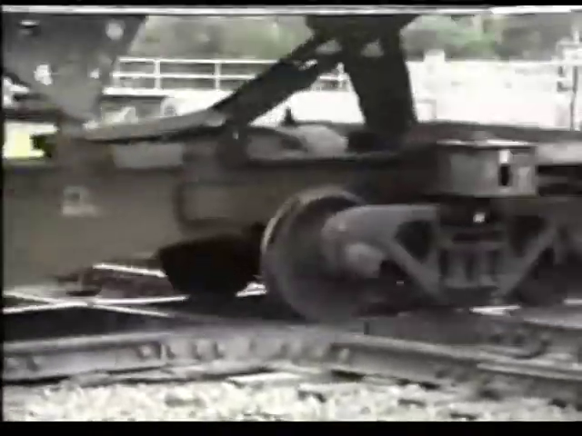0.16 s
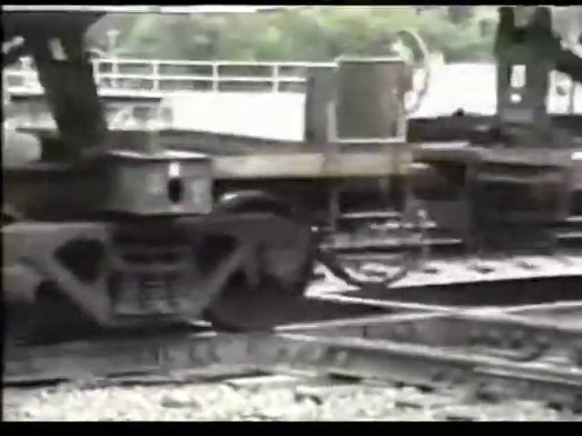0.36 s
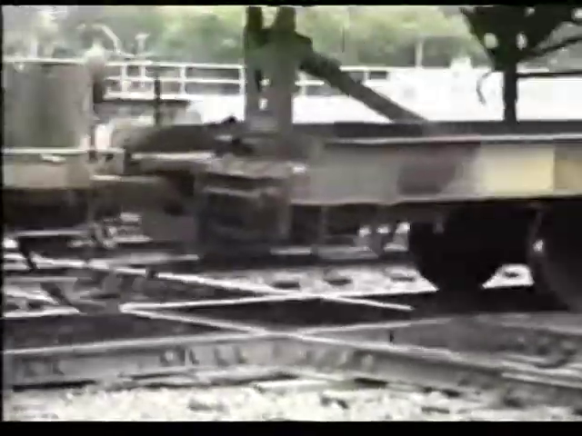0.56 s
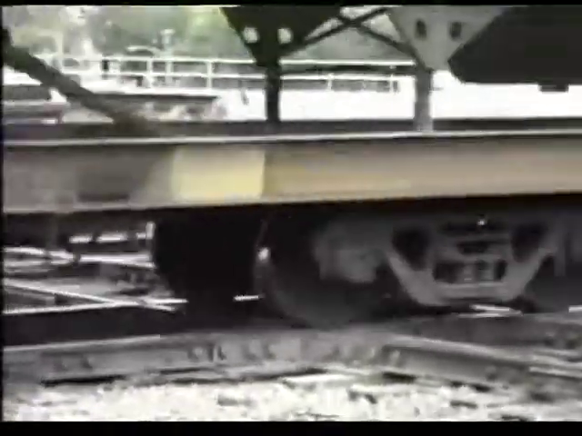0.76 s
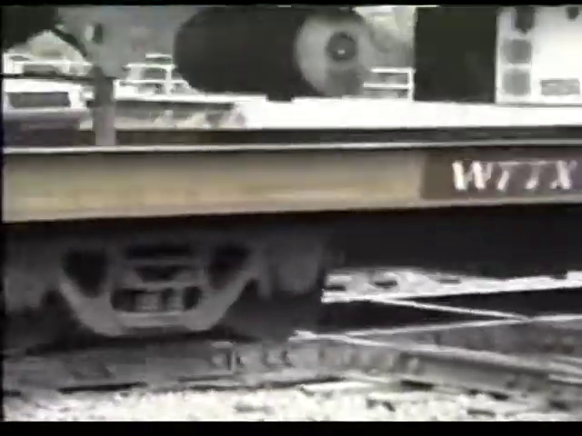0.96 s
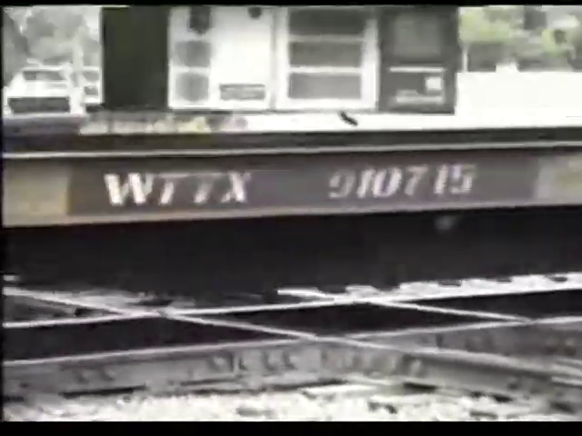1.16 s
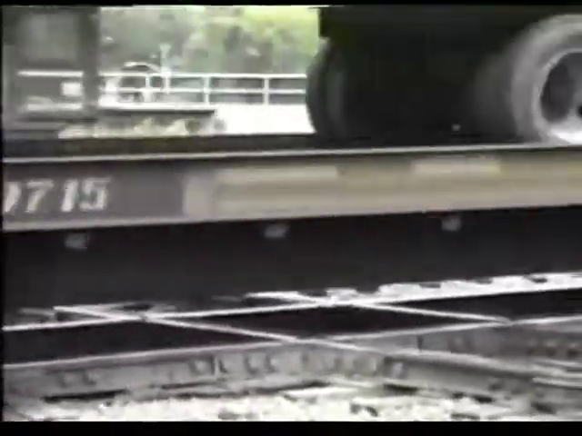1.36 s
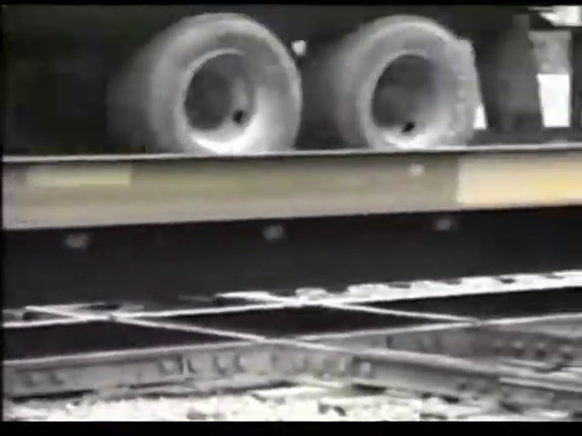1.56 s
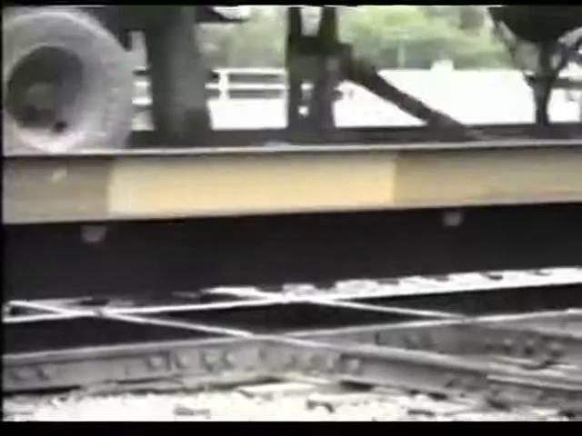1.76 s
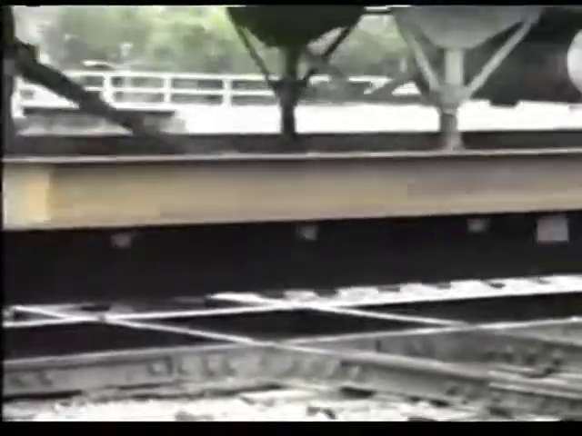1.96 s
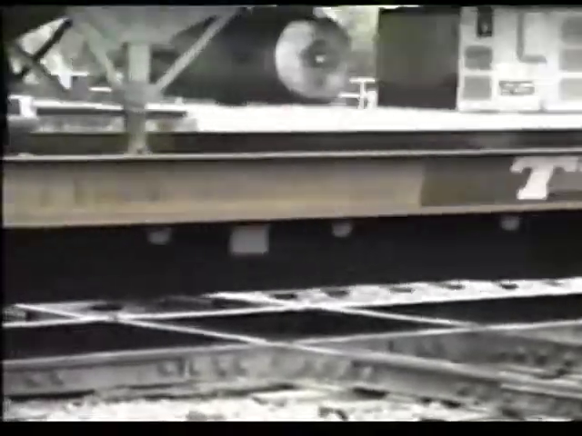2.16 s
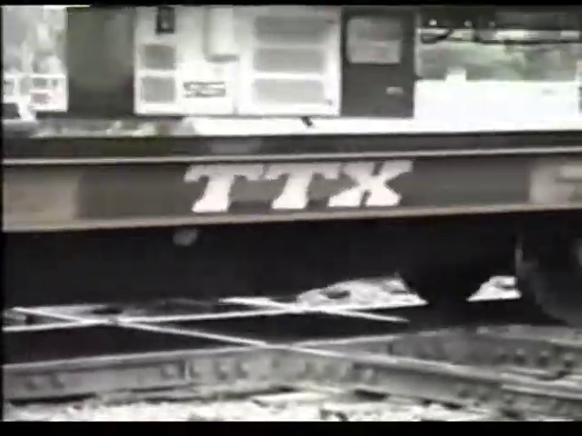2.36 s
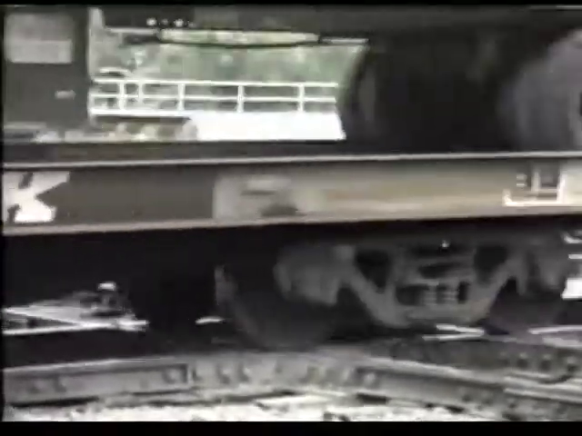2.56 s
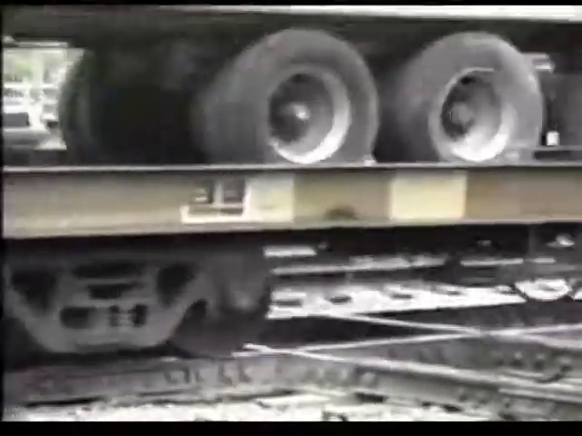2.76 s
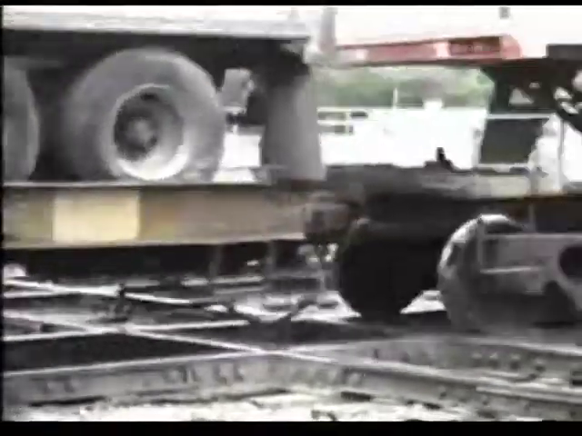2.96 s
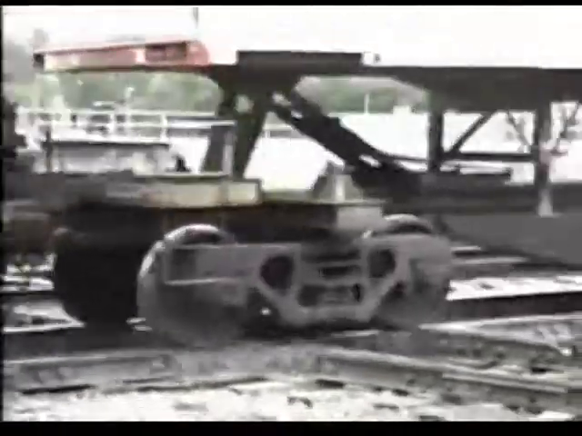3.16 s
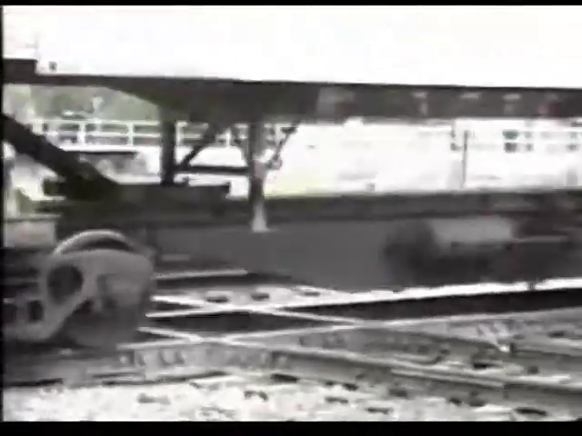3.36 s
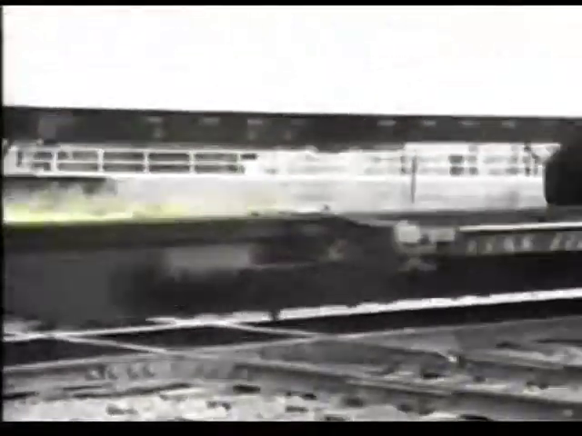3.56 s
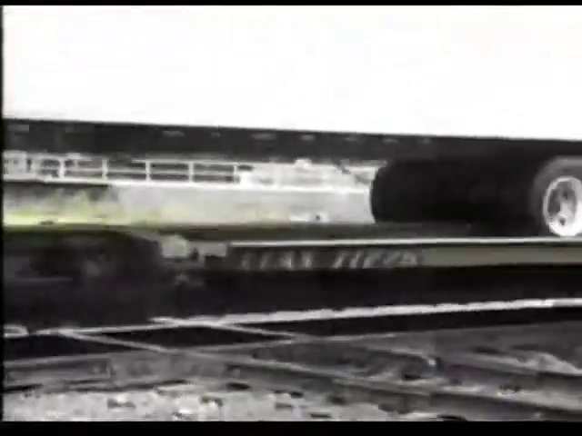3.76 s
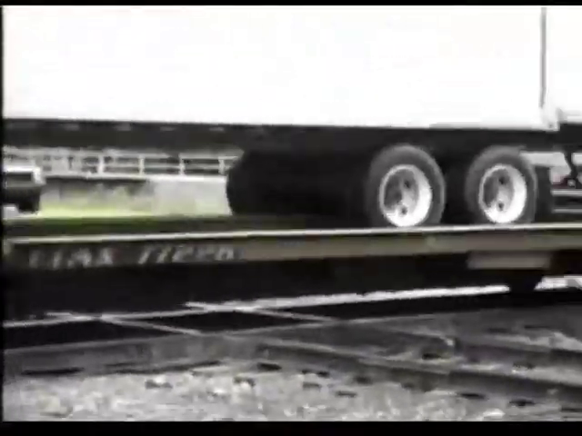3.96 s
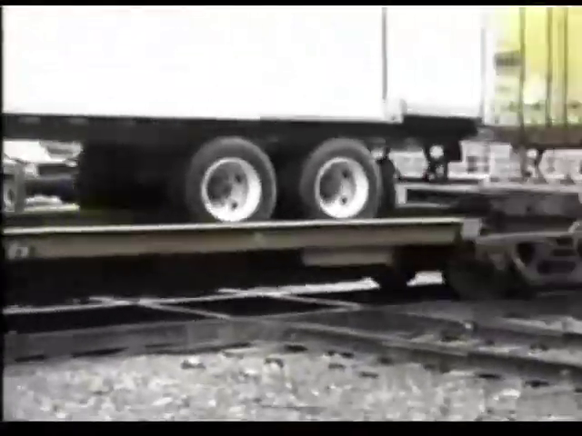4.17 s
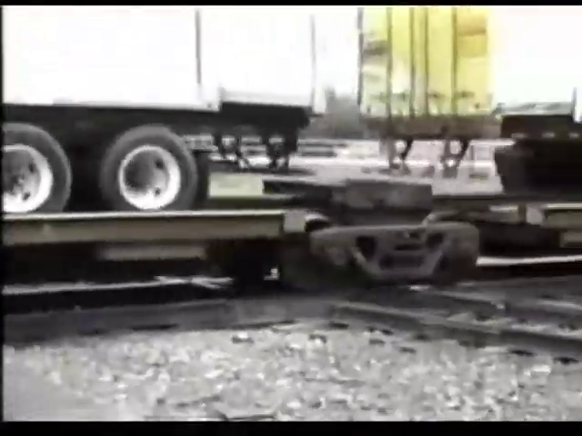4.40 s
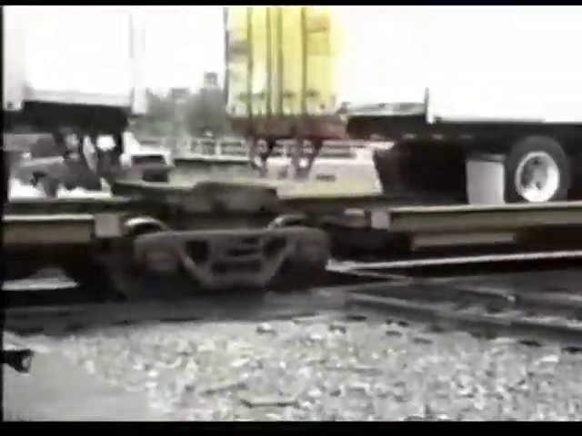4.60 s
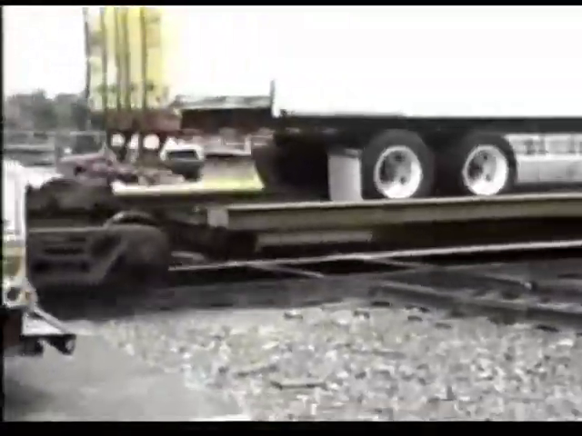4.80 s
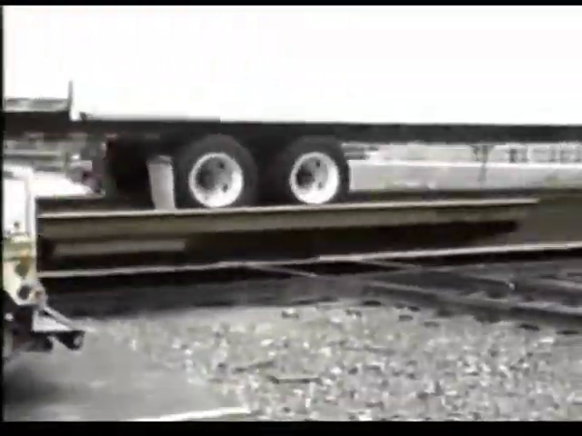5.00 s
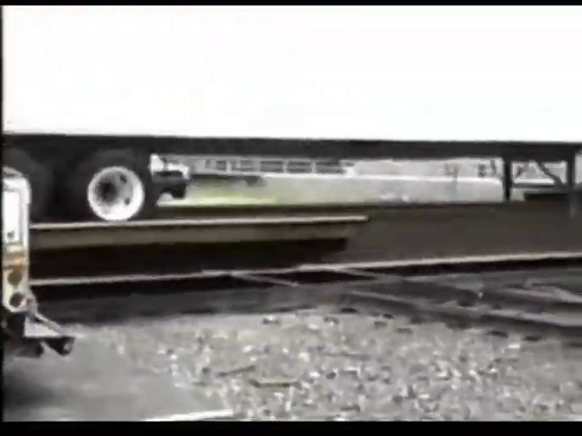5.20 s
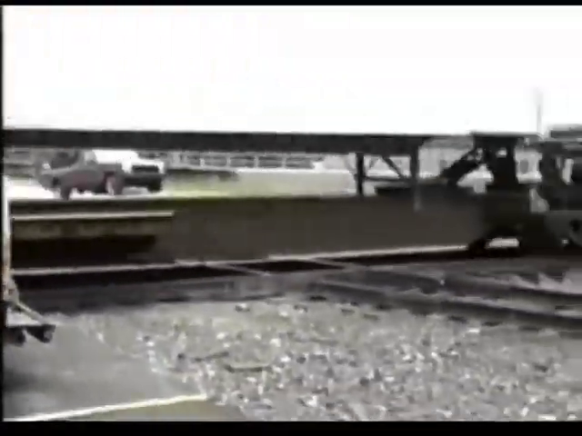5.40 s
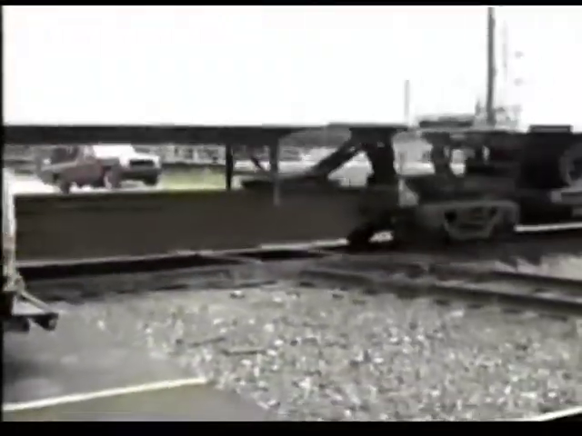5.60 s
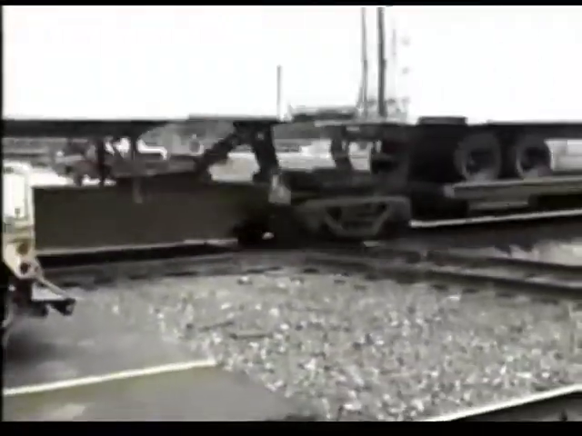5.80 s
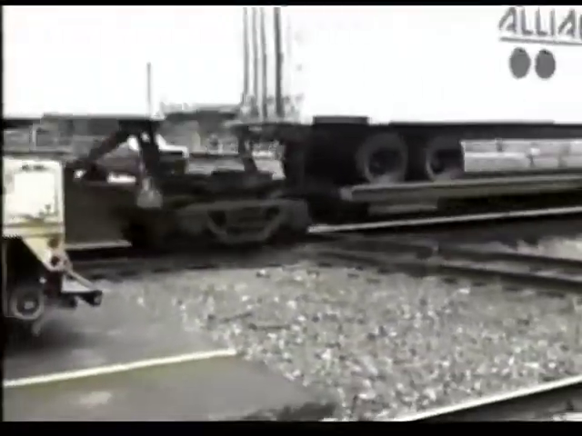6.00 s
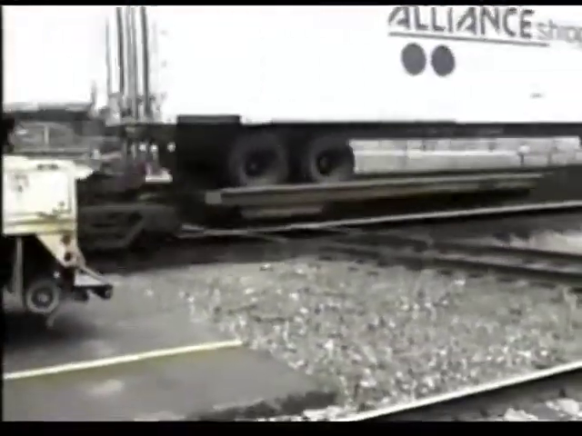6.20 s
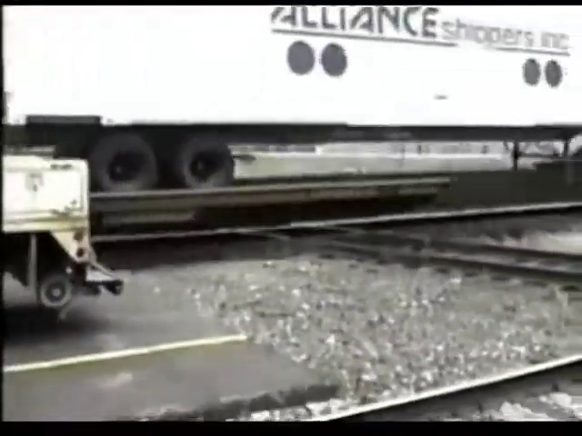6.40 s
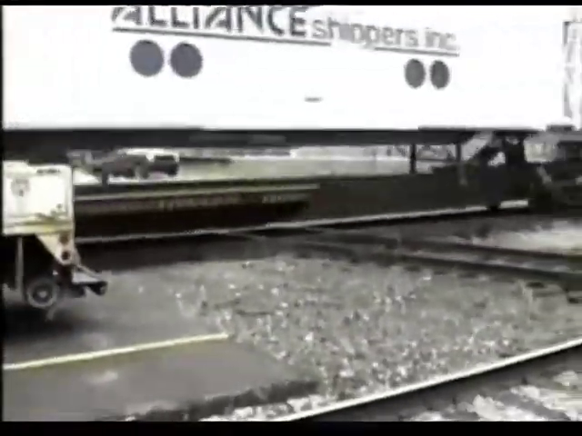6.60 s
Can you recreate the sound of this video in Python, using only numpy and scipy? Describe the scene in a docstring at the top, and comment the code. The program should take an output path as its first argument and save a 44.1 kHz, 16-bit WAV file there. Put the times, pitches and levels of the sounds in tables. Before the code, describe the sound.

A slow freight train of flatcars passes a few metres away over a steel rail crossing. Each truck drops hard three times into the gaps, with cracks, clangs and frame slams close behind. Two groups come at once, then a quieter rolling lull, two more groups, and one each later. Low rumble and hiss continue; a thin high whine shows in the lulls. Outdoors, close microphone, nearly mono, rather dry.

```python
"""A slow freight train of flatcars rolls over a steel rail crossing a few metres away.
Each truck drops three times into the gaps: noise bands with fading power make crack, clang and tail,
with frame slams and other, mostly weaker strokes. The same bands carry the rumble and tread hiss of rolling.
Decaying sines ring truck, wheels and fittings, hard blows leave a faint high ringing, and short low
swells stir the rumble.
Wheels sing faintly as wavering tones, and a thin high whine of tones and fizz is heard in the lulls."""
import sys
import numpy as np
from scipy import signal
from scipy.io import wavfile
from scipy.ndimage import uniform_filter1d

SR = 44100
rng = np.random.default_rng(int(sys.argv[2]) if len(sys.argv) > 2 else 0)


def store_wav(level_fs):
    """Save 16-bit WAV to argv[1]."""
    pcm = np.round(np.clip(np.atleast_2d(level_fs), -1, 1) * 32767)
    wavfile.write(sys.argv[1], SR, pcm.T.astype(np.int16))


N = 293265  # length [samples]

# densely packed modes of wheel, rail and car: (frequency [Hz], relative level per Hz [dB])
STEEL_SPECTRUM = [(25, -46), (40, -42), (70, -25), (120, -8), (230, 0), (290, -5.5), (370, 1.5), (520, -2),
                  (780, -0.5), (1100, -5.5), (1500, -1), (2600, -4), (5300, -12.5), (7300, -25),
                  (11000, -31)]
# wheels drop into the gaps, three drops to a truck, and the frame slams back after each:
# (time [s], level [dB], thud [dB], knock [dB], brightness [dB], crack [dB], boom [Hz], clang [Hz],
#  slam delay [s], slam level [dB], slam thud [dB], slam brightness [dB], slam crack [dB]);
# every dB column after the level is relative
WHEEL_DROPS = [(0.256, -39, 7.5, -2.5, 6, 1.5, 437, 700.0, 0.04, -1.5, 7, -1, -6.0),
               (0.381, -37, -3, -1.5, 0.5, 5, 330.0, 700.0, 0.029, 2.0, 5, 2.5, -6.5),
               (0.535, -40.5, 5.5, 2.5, -3, 3.5, 298, 700.0, 0.043, -1.5, 6, 3.5, -5),
               (0.818, -38.5, 3, 0.5, 3.5, -3, 240.0, 1400.0, 0.047, -2.5, 1.0, 3, -2.5),
               (0.945, -36, 1, -1.5, -2.5, 3.0, 180.0, 1610.0, 0.04, -2.0, 2.5, 0.5, 3),
               (1.099, -41.5, 8, 4.0, 1.5, 4.5, 150.0, 1410, 0.045, -2, 7.0, 3.5, 0.5),
               (2.612, -37.5, 6, 0.5, 3.0, -0.5, 150.0, 1400.0, 0.048, -4, 2, 2, -9),
               (2.739, -36, 1.5, -0.5, 2, 0.5, 520.0, 1420, 0.037, -3.5, 6, 2.0, -1.0),
               (2.894, -41, 11.5, 5.5, 4, 0.5, 110.0, 1600.0, 0.042, -0.5, 3.0, 2.5, -1.0),
               (3.175, -41.5, 9, -2, 1, -0.5, 282, 1220.0, 0.045, -0.5, -5, 2, -2),
               (3.301, -39.5, 9.5, 4, 3, -2.5, 273, 1050, 0.041, 1.5, -8, -1.5, -1),
               (3.457, -40, 5, 3, -5.5, 5, 282, 1050, 0.039, -1.5, 5, 4, -5),
               (4.479, -40, 8.0, 1.5, 6.0, 3.5, 280.0, 1050, 0.041, 2, -2, -2, 1),
               (4.603, -36.5, -9, 3, 4.5, 2.5, 380.0, 1060.0, 0.042, -2.5, 3.5, 4.5, 0.5),
               (4.759, -38.5, 0, 6, 3.5, 1.5, 200.0, 1040, 0.039, -2, 0, 3.0, -2),
               (5.884, -39.5, 0, 1.5, 5.5, 5.5, 336, 1230, 0.043, -5, 6, 8, -5),
               (6.01, -36.5, -2, 4, 2.5, 1.5, 380.0, 1400.0, 0.028, -4.5, 6, 6.5, -2),
               (6.166, -40, 5, 3, 0.5, 5.5, 444, 1220.0, 0.041, -1.0, 2.0, 3.5, -1.5)]
# edges and centres of the noise bands that stand for the steel [Hz]
EDGES = np.concatenate([22 * 2 ** np.arange(0, 3, .5), np.geomspace(176, 12400, 25)])
CENTRES = np.sqrt(EDGES[:-1] * EDGES[1:])


def from_db(db):
    """Decibels to gain."""
    return 10 ** (np.asarray(db) / 20)


def rms_one(x):
    """Scale to unit rms."""
    return x / np.sqrt(np.mean(x ** 2) + 1e-20)


def at_hz(points, hz):
    """Read a table on a log-frequency axis."""
    table_hz, values = np.array(points).T
    return np.interp(np.log(hz), np.log(table_hz), values)


def band_shares(spectrum):
    """Share of a spectrum's power that falls in each band."""
    power = from_db(at_hz(spectrum, CENTRES)) ** 2 * np.diff(EDGES)
    return power / power.sum()


def drift(rate):
    """Random wander of rms 1: straight lines between random points, rate points a second."""
    knots = rng.standard_normal(4000)
    return rms_one(np.interp(np.arange(N) / SR * rate, np.arange(len(knots)), knots))


def low_pass(x, hz):
    """Steep low-pass."""
    return signal.sosfilt(signal.ellip(10, .1, 80, hz, fs=SR, output="sos"), x)


def band_noise(low_hz, high_hz, order):
    """Stereo noise in one band, rms 1."""
    band = signal.butter(order, [low_hz, high_hz], "band", fs=SR, output="sos")
    return rms_one(signal.sosfilt(band, rng.standard_normal((2, N))))


def clicks(times, sizes):
    """One click of the given size at each time."""
    places = np.clip(np.round(times * SR).astype(int), 0, N - 1)
    return np.bincount(places, sizes, N) + 1e-18


def fade(energy, t60):
    """Energy put into steel dies away exponentially, by 60 dB in t60 seconds."""
    return signal.lfilter([1], [1, -10 ** (-6 / (t60 * SR))], energy)


def build_up(energy, seconds):
    """Energy takes a moment to spread through the steel."""
    r = np.exp(-1 / (seconds * SR))
    return signal.lfilter([1 - r], [1, -r], energy)


def dense_modes(powers):
    """Countless overlapping modes: nearly mono noise bands, each following its own power in time."""
    # stereo width: (frequency [Hz], side relative to mid [dB])
    width = [(25, 4), (60, -19), (110, -31), (200, -57), (550, -31), (950, -59), (1650, -29), (2700, -19),
             (4500, -16.5), (7500, -13.5), (9500, -9), (12000, -19)]
    mid, side = np.zeros((2, N))
    white = rng.standard_normal((2, 2, N))
    for k, power in enumerate(powers):
        band = signal.butter(2, EDGES[k:k + 2], "band", fs=SR, output="sos")
        # neighbouring bands take turns on two independent noises
        noise = rms_one(signal.sosfilt(band, white[k % 2])) * np.sqrt(power)
        mid += noise[0]
        side += noise[1] * from_db(at_hz(width, CENTRES[k]))
    return np.array([mid + side, mid - side])


def frame_colour(x):
    """The car frames lift a few narrow bands of all that passes through them."""
    # hollow resonances of the frames: (frequency [Hz], width [Hz], added level [dB])
    resonances = [(260, 67, -20), (372, 17, -15), (1700, 27, -32)]
    coloured = x
    for hz, width_hz, db in resonances:
        b, a = signal.iirpeak(hz, hz / width_hz, fs=SR)
        coloured = coloured + from_db(db) * signal.lfilter(b, a, x)
    return coloured


def rolling(lumpy_db=0.5, rough_db=0.47, patchy_db=0.97, knocks_per_s=34, knock_db=1.5,
            knock_spread_db=-0.5, knock_t60=0.061, smooth_share=0.82):
    """Heavy cars rumble on the track, treads hiss on the rail, loose gear rattles in random knocks."""
    # swells as each truck passes, sinks between: (time [s], rumble level [dB], tread level [dB])
    swells = [(0.0, -52, -61), (0.4, -51.5, -44), (0.7, -52.5, -57), (1.0, -50, -43), (1.3, -49, -54),
              (1.5, -54.0, -60.5), (1.8, -57.5, -62.5), (2.05, -54, -59.5), (2.4, -55.9, -61),
              (2.8, -49, -50.5), (3.2, -46.3, -51), (3.6, -50.5, -58), (3.85, -53.5, -58.5),
              (4.25, -56.5, -59), (4.6, -44.5, -52.4), (5.0, -46.5, -55.5), (5.35, -51.5, -59.5),
              (5.65, -51.5, -59.5), (6.1, -43.5, -45), (6.4, -49.6, -59), (6.65, -51.5, -58)]
    # rumble of the cars: (frequency [Hz], relative level per Hz [dB])
    rumble_spectrum = [(25, -38), (40, -32), (60, -16.5), (85, 0.5), (130, -2.5), (200, -1), (350, -4),
                       (500, -9.5), (800, -16.5), (1500, -57)]
    # hiss of the treads: (frequency [Hz], relative level per Hz [dB])
    tread_spectrum = [(200, -13), (450, -6), (800, 5), (1050, 4.5), (1400, 3), (2000, -0.5), (4000, -6),
                      (5500, -14), (7500, -17), (11000, -23.5)]
    s, *levels = np.transpose(swells)
    rumble_db, tread_db = (np.interp(np.arange(N) / SR, s, level) for level in levels)

    sizes = from_db(knock_db + knock_spread_db * rng.uniform(-1.1, 1, N)) ** 2
    happens = rng.random(N) < knocks_per_s / SR
    knocks = build_up(fade(sizes * happens + 1e-18, knock_t60), 0.00089)

    rumble = from_db(rumble_db + lumpy_db * drift(35)) ** 2
    tread = from_db(tread_db + rough_db * drift(60)) ** 2 * (smooth_share + knocks)
    for low, high in zip(band_shares(rumble_spectrum), band_shares(tread_spectrum)):
        patchy = from_db(patchy_db * drift(20)) ** 2
        yield low * rumble * patchy + high * tread


def high_whine(fizz_db=-68, fizz_side_db=-26.0, low_fizz_db=-81.0, phase_gap=0.091):
    """Steady tones and two fizz bands come and go with the lulls, the ears slightly out of step."""
    # tones of the whine: (frequency [Hz], level [dB])
    whine_tones = [(7935, -89), (11835, -74), (11865, -74), (15145, -79), (15175, -78), (15342, -78),
                   (15646, -77), (15705, -75), (15735, -61)]
    # lulls in which it is heard: (start [s], end [s])
    lulls = [(0, .085), (.16, .25), (1.34, 2.58), (3.62, 4.31), (5.01, 5.72), (6.45, 6.7)]
    t, ears = np.arange(N) / SR, np.array([[1], [-1]])
    gate = sum(1.0 * ((t >= start) & (t < end)) for start, end in lulls)
    heard = uniform_filter1d(gate, size=600)

    tones = np.zeros((2, N))
    for hz, db in whine_tones:
        phase = 2 * np.pi * (hz * t + rng.random()) + phase_gap * ears  # the gap is in radians
        tones += from_db(db) * np.sqrt(2) * np.sin(phase)

    fizz = from_db(fizz_db) * band_noise(15150, 15750, order=4)
    low_fizz = from_db(low_fizz_db) * band_noise(11500, 12300, order=4)
    mid, side = fizz + low_fizz
    return heard * (tones + mid + from_db(fizz_side_db) * side * ears)


def wheel_song(waver_db=0.8, waver_hz=3):
    """A rubbing wheel swells into a faint tone, unsteady in pitch and level."""
    # (start [s], end [s], frequency [Hz], level [dB])
    songs = [(.08, .32, 427, -55), (1.45, 2.0, 1362, -70.5), (1.9, 2.62, 1361, -67), (6.1, 6.65, 1890, -67)]
    t, out = np.arange(N) / SR, np.zeros(N)
    for start, end, hz, level_db in songs:
        progress = np.clip((t - start) / (end - start), 0, 1)
        swell = np.sqrt(np.sin(np.pi * progress).clip(0))
        phase = 2 * np.pi * np.cumsum(hz + waver_hz * drift(40)) / SR
        out += swell * from_db(level_db + waver_db * drift(32)) * np.sqrt(2) * np.sin(phase)
    return out


def blows():
    """All strokes on the steel, one row each: wheel drops, the slams that follow them, and the others."""
    # the other, mostly weaker strokes: first touches of wheels, further rail joints, single clunks;
    # in the columns of every row returned:
    # (time [s], level [dB], thud [dB], knock [dB], brightness [dB], crack [dB], boom [Hz], clang [Hz])
    other_strokes = [(0.092, -47.5, 2, 1.0, 1.5, 3, 377, 1860),
                     (0.17, -49, 4.5, -12, -2, -6.5, 450.0, 1600.0),
                     (0.24, -45, 10.5, 0.0, -1.0, -2, 280.0, 1400.0),
                     (0.426, -56.0, 2.0, 0.5, 0.5, 0.5, 240.0, 1400.0),
                     (0.655, -51, 2.5, -15, 6, -3.5, 240.0, 1850.0),
                     (0.731, -44.5, 4.5, 2, -1.5, -8, 332, 1610.0),
                     (0.806, -49, 4.0, -9, -1.5, -2.5, 150.0, 1400.0),
                     (0.972, -42, 4, 1, 0.5, 0, 330.0, 1400.0), (1.298, -49, 2.0, 5, 0, -0.5, 300.0, 920.0),
                     (1.551, -59, 10, 2, 1, -12, 240.0, 700.0),
                     (1.959, -59.5, 12, 6, -9.5, -10, 450.0, 5600.0),
                     (2.129, -63, 14, 3, 7, -13, 330.0, 1400.0),
                     (2.292, -59.0, 13, 4, -2, -7, 280.0, 1400.0),
                     (2.448, -48, 4, 3.5, 0, -1.5, 240.0, 1390),
                     (2.591, -46.5, 10, -2, -1, -13, 280.0, 1850.0),
                     (2.634, -45.5, -1, 0.0, -3.5, 1.0, 280.0, 1600.0),
                     (2.781, -43, 10, -1, -1.5, 2, 330.0, 5600.0),
                     (2.818, -43.5, 14, 0.0, -1.0, -4.0, 150.0, 5600.0),
                     (3.012, -49.5, 0, -4, -6, 8, 150.0, 1850.0),
                     (3.091, -48.5, 8, 0.0, 0.0, -6, 450.0, 2120.0),
                     (3.158, -44.5, -1, -0.5, 0.5, -7.5, 240.0, 1220.0),
                     (3.331, -45.5, -5, -4, 4, 2.5, 450.0, 5600.0),
                     (3.372, -41.5, 7, -1, -3, 1, 279, 1400.0),
                     (3.654, -46.5, -3, 2.5, -1.5, -1.5, 330.0, 1210),
                     (3.923, -57, 10, 6, 4, -13, 240.0, 5600.0),
                     (4.155, -57, 12, 5.5, -11, -3, 380.0, 1400.0),
                     (4.313, -45.5, 7, 1, -1, 1.5, 200.0, 1850.0),
                     (4.392, -46, -6, 2, -6, 2, 280.0, 3220.0),
                     (4.458, -43.5, 11, 2.5, 0.0, -12, 200.0, 3690.0),
                     (4.633, -54.0, 2.5, 0.5, 0.5, 0.5, 380.0, 1850.0),
                     (4.97, -50, -4, 6, -2.5, 1.5, 300.0, 1850.0),
                     (5.562, -54.5, 10, 5, -9, 0.0, 450.0, 1220.0),
                     (5.627, -57.0, 9, 6, -5, -1, 380.0, 800.0),
                     (5.719, -45.5, -4, 3, -1, 3.0, 280.0, 3690.0),
                     (5.79, -47, -6, 1.5, -1, -0.5, 110.0, 2120.0),
                     (5.838, -52, 1.0, -1.0, 9, -9.0, 280.0, 1610.0),
                     (5.873, -46, 3, 3, -1, -3, 450.0, 1600.0),
                     (6.055, -46.0, 9, -3, 7.0, 3, 450.0, 1400.0),
                     (6.366, -47.5, 5, 1.5, -2.5, 1, 380.0, 3690.0)]
    rows = []
    for drop in WHEEL_DROPS:
        s, level, thud, knock, bright, crack, boom_hz, clang_hz = drop[:8]
        delay, slam, slam_thud, slam_bright, slam_crack = drop[8:]
        rows.append((s, level, thud, knock, bright, crack, boom_hz, clang_hz))
        rows.append((s + delay, level + slam, slam_thud, knock, slam_bright, slam_crack,
                     boom_hz, clang_hz))
    return np.vstack([rows, other_strokes])


def bounces(s, count=5, scatter=0.34, gap_s=0.0051, loss_db=4):
    """Steel bounces unevenly, on average ever more weakly: (times, energy shares), a row per blow."""
    gaps, luck_db = rng.standard_normal((len(s), 2, count)).transpose(1, 0, 2)
    gaps = gap_s * np.exp(scatter * gaps)
    times = s[:, None] + np.cumsum(gaps, axis=1) - gaps[:, :1]  # the first touch is the blow itself
    shares = from_db(luck_db - loss_db * np.arange(count)) ** 2
    return times, shares / shares.sum(axis=1, keepdims=True)


def wheel_blows(crack_t60=0.029, crack_gain_db=8.0, tail_db=-6.5, crack_rise_s=0.0014,
                clang_rise_s=0.0094, rise_cycles=1.0, chatter_db=0.05, colour_db=0.62,
                thud_hz=460, knock_hz=740, bright_hz=2400, gain_db=0.81,
                boom_lift_db=5, boom_octaves=0.31, clang_lift_db=3.5, clang_octaves=0.19,
                crack_treble_db=2.5, crack_hz=3980):
    """Each blow gives a bouncing crack, a clang and a long tail; loose parts make the ringing chatter."""
    # decay of the clang: (frequency [Hz], t60 [s])
    clang_t60 = [(100, 0.68), (400, 0.17), (1500, 0.28), (5000, 0.43), (10000, 0.51)]
    # decay of the long tail that travels along rails and cars: (frequency [Hz], t60 [s])
    tail_t60 = [(100, 0.63), (400, 1.06), (1500, 0.92), (5000, 0.91), (10000, 0.54)]
    s, level_db, thud_db, knock_db, bright_db, crack_db, boom_hz, clang_hz = blows().T
    touches, touch_shares = bounces(s)
    chatter = from_db(chatter_db * drift(260)) ** 2
    colours = rng.standard_normal((len(s), len(CENTRES)))  # every blow has its own tone colour
    for hz, share, colour in zip(CENTRES, band_shares(STEEL_SPECTRUM), colours.T):
        # how far this band belongs to thud, brightness, knock, boom and clang
        low = 1 / (1 + (hz / thud_hz) ** 4)
        high = 1 / (1 + (bright_hz / hz) ** 2)
        middle = np.exp(-2 * np.log2(hz / knock_hz) ** 2)
        boom = np.exp(-(np.log2(hz / boom_hz) / boom_octaves) ** 2)
        ring = np.exp(-(np.log2(hz / clang_hz) / clang_octaves) ** 2)
        tone_db = boom * boom_lift_db + ring * clang_lift_db + colour_db * colour
        tone_db += low * thud_db + middle * knock_db + high * bright_db
        energy = share * from_db(gain_db + level_db + tone_db) ** 2
        struck = clicks(s, energy)

        treble_db = crack_treble_db * np.exp(-2 * np.log2(hz / crack_hz) ** 2)
        sharp = energy * from_db(crack_gain_db + crack_db + treble_db) ** 2 * (1 - low)
        touch_energy = sharp[:, None] * touch_shares
        crack = fade(clicks(touches.ravel(), touch_energy.ravel()), crack_t60)
        clang = fade(struck, at_hz(clang_t60, hz))
        tail = from_db(tail_db) ** 2 * fade(struck, at_hz(tail_t60, hz))

        swell_s = rise_cycles / hz  # low modes need longer to swell
        ringing = build_up(clang + tail, clang_rise_s + swell_s) * chatter
        yield build_up(crack, crack_rise_s + swell_s) + ringing


def truck_ring(detune=0.0071):
    """Every blow rings the strong modes of wheel and truck, each time at slightly different pitches."""
    # modes that stand out of the clang: (frequency [Hz], level relative to the blow [dB], t60 [s])
    truck_modes = [(236, -12, 0.26), (374.3, -8, 0.14), (762, -22, 0.15), (1358, -13.5, 0.48),
                   (1595, -6.5, 0.15), (2417, -7, 0.17), (2650, -11, 0.1)]
    out, t = np.zeros(N + SR), np.arange(SR // 2) / SR
    hz, mode_db, t60 = np.array(truck_modes).T[:, :, None]
    for s, level_db, *_ in blows():
        pitch = hz * (1 + detune * rng.standard_normal(hz.shape))
        decay = from_db(level_db + mode_db - 60 * t / t60)
        start = round(s * SR)
        out[start:start + len(t)] += (decay * np.sin(2 * np.pi * pitch * t)).sum(axis=0)
    return out[:N]


def fittings_ring(count=20, low_hz=600, high_hz=6000, ring_db=-9.0, t60=0.33, rise_s=0.0013):
    """No two cars are alike: each blow rings scattered springs and plates of its own."""
    out, t = np.zeros(N + SR), np.arange(SR // 3) / SR
    for s, level_db, *_ in blows():
        place, damping, phase = rng.random((3, count, 1))
        hz = low_hz + (high_hz - low_hz) * place ** np.sqrt(2)
        fall_db = 60 * t / (t60 * (.5 + damping))
        decay = from_db(level_db + ring_db + at_hz(STEEL_SPECTRUM, hz) - fall_db)
        modes = decay * np.sin(2 * np.pi * (hz * t + phase))
        start = round(s * SR)
        out[start:start + len(t)] += modes.sum(axis=0) * (1 - np.exp(-t / rise_s))
    return out[:N]


def low_swells(swell_s=0.017):
    """Short low swells rise and die within the rumble, each a sine under a smooth rise and fall."""
    # (time [s], peak level of the swell [dB], frequency [Hz])
    swells = [(0.249, -36, 243), (.4, -37, 380), (.84, -44.5, 145), (1.235, -50, 131), (2.839, -38.5, 153),
              (3.035, -44, 156), (3.361, -46, 377), (3.869, -50, 207), (4.468, -35, 357), (4.64, -40, 371),
              (4.776, -40, 113), (5.021, -51, 315), (5.08, -47, 118), (5.538, -54, 515), (6.001, -42, 364),
              (6.282, -52, 493), (6.386, -48, 402)]
    out, t = np.zeros(N + SR), np.arange(SR // 4) / SR
    envelope = t / swell_s * np.exp(1 - t / swell_s)
    for s, level_db, hz in swells:
        tone = np.sin(2 * np.pi * (hz * t + rng.random()))
        start = round(s * SR)
        out[start:start + len(t)] += from_db(level_db) * envelope * tone
    return out[:N]


def high_ringing(hard_db=-42, ring_db=-22.5, t60=1.4, rise_s=0.0042,
                 reference_hz=2300, treble_db_per_octave=-4.0):
    """Hard blows leave a faint, long high ringing of six slowly decaying sines."""
    # pitches of the high ringing, a row for each group of blows: (six frequencies [Hz])
    pitches = [(2422.0, 2541.0, 3133.0, 3305.0, 4985.0, 5362.0),
               (2336.0, 3704.0, 3941.0, 5319.0, 5545.0, 5889.0),
               (4931.0, 5308.0, 5577.0, 5663.0, 5922.0, 6169.0),
               (2401.0, 3122.0, 3919.0, 4436.0, 5416.0, 6180.0),
               (2401.0, 3779.0, 3908.0, 4070.0, 4899.0, 6029.0),
               (3155.0, 3316.0, 3693.0, 3930.0, 5297.0, 6148.0)]
    out, t = np.zeros(N + SR), np.arange(SR) / SR
    starts = np.array(WHEEL_DROPS)[::3, 0]  # a group begins with the first of three drops
    for s, level_db, *_ in blows():
        group = max(np.searchsorted(starts, s, "right") - 1, 0)
        hz = np.array(pitches[group])[:, None]
        phase = rng.random(hz.shape)
        if level_db > hard_db:
            tone_gain = from_db(treble_db_per_octave * np.log2(hz / reference_hz))
            tones = (tone_gain * np.sin(2 * np.pi * (hz * t + phase))).sum(axis=0)
            decay = from_db(level_db + ring_db - 60 * t / t60)
            start = round(s * SR)
            out[start:start + SR] += tones * decay * (1 - np.exp(-t / rise_s))
    return out[:N]


def scene(hiss_db=-75.0, ground_db=-77.0, top=.13, train_top_hz=12000):
    """Blows and rolling excite the same steel; trembling ground and a faint stereo hiss lie underneath."""
    powers = (struck + rolled for struck, rolled in zip(wheel_blows(), rolling()))
    steel = frame_colour(dense_modes(powers))
    train = steel + low_swells() + truck_ring() + high_ringing() + fittings_ring() + wheel_song()
    hiss = from_db(hiss_db) * band_noise(low_hz=1400, high_hz=6300, order=1)
    ground = from_db(ground_db) * band_noise(low_hz=22, high_hz=63.4, order=2)[0]  # same in both ears
    rounded = top * np.tanh(train / top)  # the hardest cracks are blunted
    return low_pass(rounded + hiss + ground, train_top_hz) + high_whine()


def record(dry, cutoff_hz=16200):
    """The top is cut steeply."""
    return low_pass(dry, cutoff_hz)


dry = scene()
out = record(dry)
store_wav(out)
```